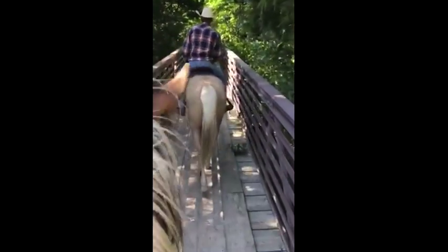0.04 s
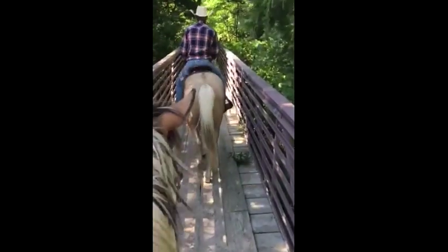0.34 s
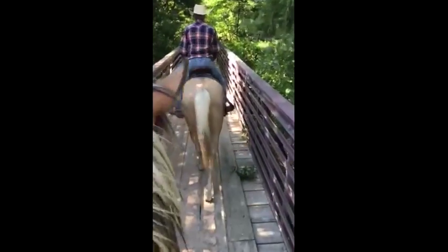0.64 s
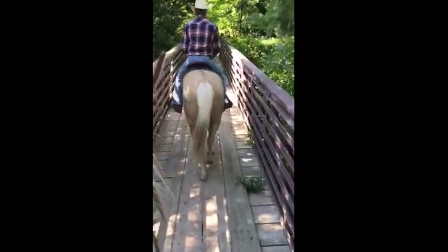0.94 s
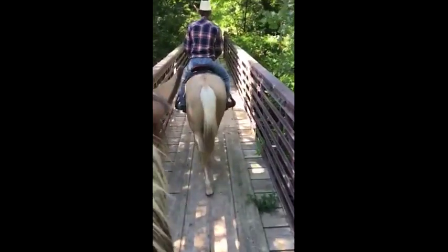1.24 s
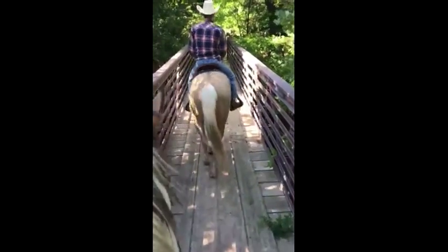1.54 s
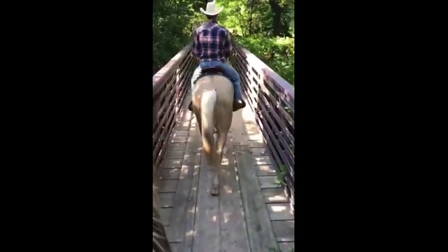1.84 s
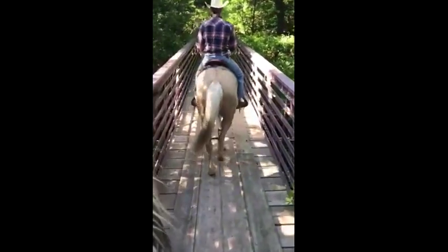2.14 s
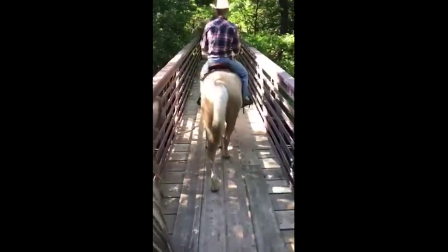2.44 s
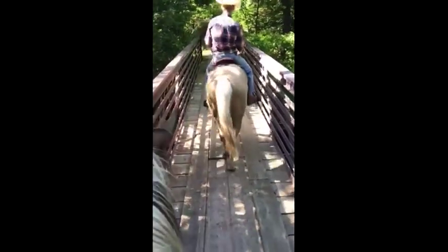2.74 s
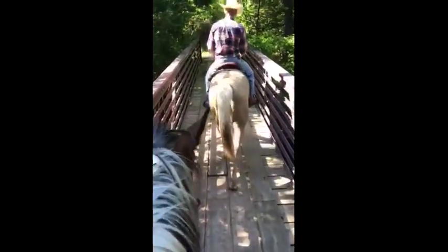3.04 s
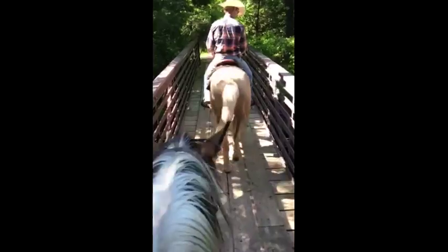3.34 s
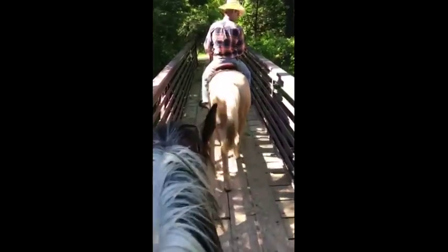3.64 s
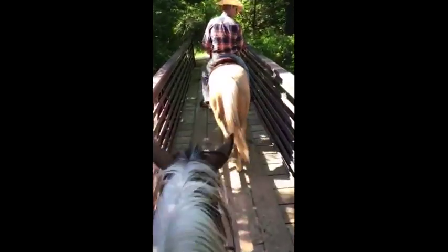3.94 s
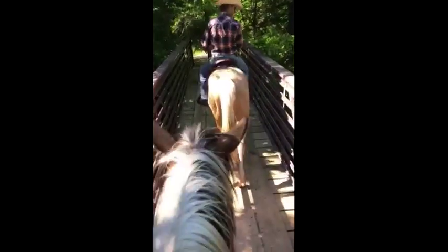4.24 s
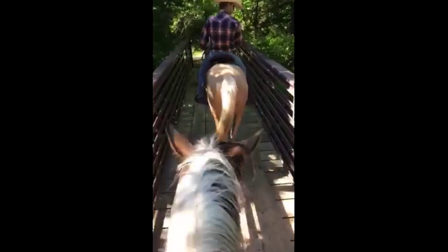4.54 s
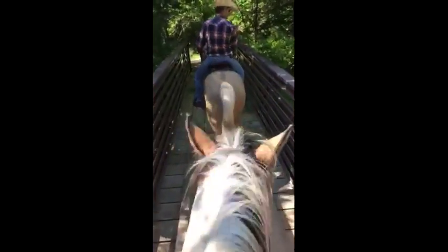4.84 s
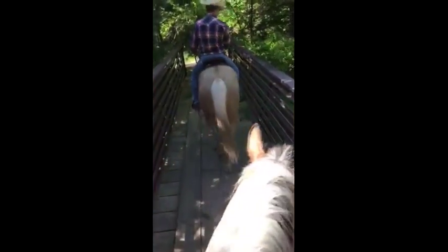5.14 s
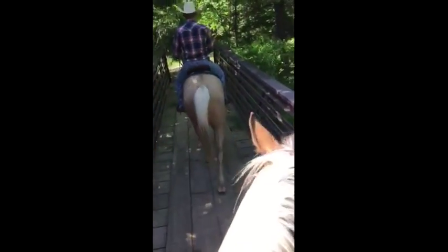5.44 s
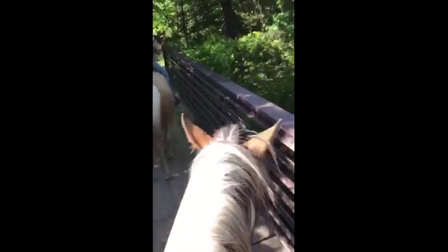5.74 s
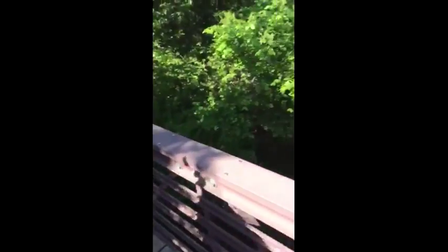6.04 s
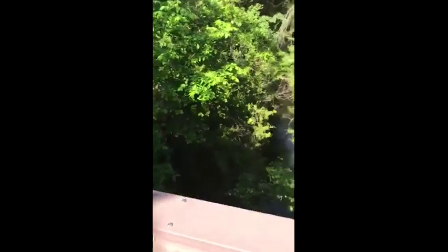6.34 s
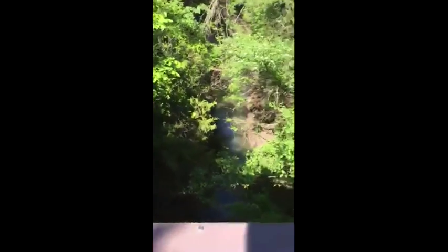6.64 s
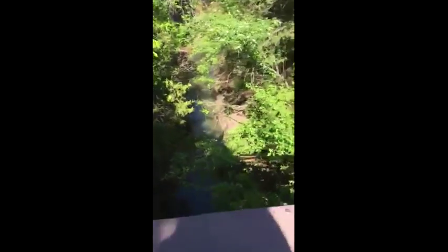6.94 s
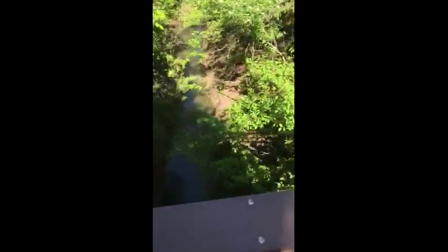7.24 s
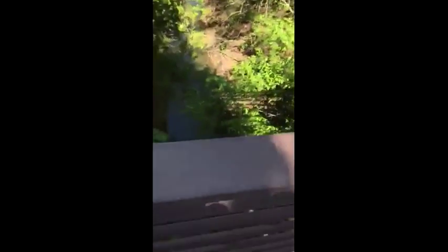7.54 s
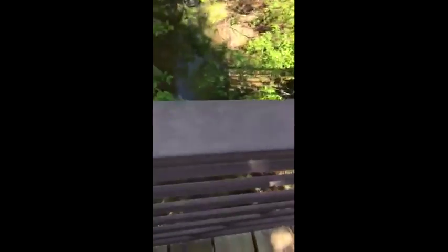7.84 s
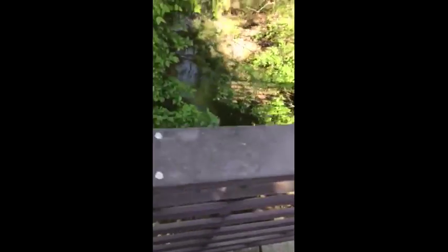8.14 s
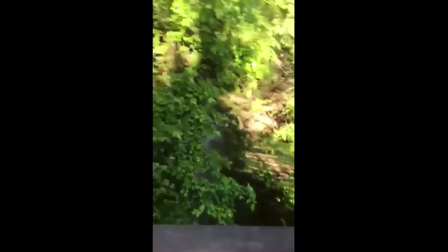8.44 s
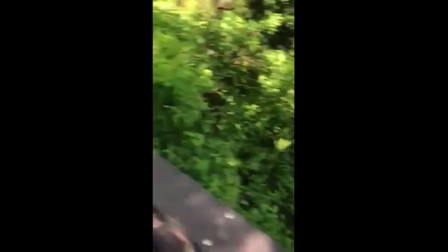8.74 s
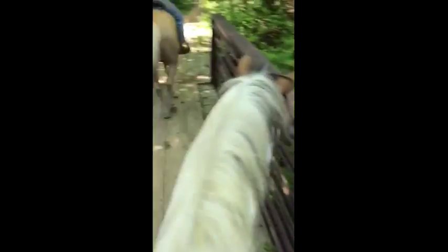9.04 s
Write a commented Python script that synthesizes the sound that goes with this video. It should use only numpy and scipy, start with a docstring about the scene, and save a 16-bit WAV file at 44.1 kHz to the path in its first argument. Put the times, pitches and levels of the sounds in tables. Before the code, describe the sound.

Hollow hoofbeats knock on wooden bridge boards from start to finish, about five or six a second, as two horses walk out of step. The first steps sound firm and tight, then the planks rattle and echo more and the span hums low underneath. Small gritty clicks and soft rubbing of tack and clothes sit close to the microphone, at saddle height, with faint steady woodland air behind.

```python
"""Two horses on a plank bridge

Woodland, heard from the saddle of the second horse. Each hoof gives a hollow clop, a board knock and a
deck thud, and keeps the span rumbling; hard landings favour the clop, soft ones the thud.
Grit crunches underfoot, the tack clicks and rustles, and the woods hiss faintly."""
import sys
import numpy as np
from scipy import signal
from scipy.fft import rfft, irfft, next_fast_len
from scipy.io import wavfile

SR = 44100
rng = np.random.default_rng(int(sys.argv[2]) if len(sys.argv) > 2 else 0)


def output_pcm(signal):
    """Save a mono or channel-first signal as 16-bit PCM at the path in sys.argv[1].

    Samples are clipped to [-1, 1] before scaling.
    """
    pcm = np.clip(np.atleast_2d(signal).T, -1, 1) * 32767
    wavfile.write(sys.argv[1], SR, np.round(pcm).astype(np.int16))


N = 405455
BLOW_S = np.arange(int(SR * .7)) / SR   # time axis of one impact
BLOW_N = len(BLOW_S)
DECK_HZ = 94.3   # stiffer spots boom above this, knock more and thud less

# Hoof falls. Each row: start in seconds, force in dB, landing hardness in dB, deck boom in Hz,
# board note in Hz, clop note in Hz.
HOOVES = [(0.003, -35.5, 3.5, 87.6, 197, 620), (0.322, -33.5, -3.5, 120, 185, 470),
          (0.598, -22, -1.5, 88.5, 215, 660), (0.969, -37.5, -7, 108, 168, 600),
          (1.27, -26.5, 4, 76, 149, 488), (1.486, -27, -3.5, 101, 220, 587),
          (1.58, -35.5, 8.5, 108, 358, 608), (1.868, -23, 2, 84.3, 179, 617),
          (2.11, -53.5, -24, 74, 180, 705), (2.228, -29, 5, 82, 291, 660),
          (2.468, -37.5, -5, 88.6, 198, 605), (2.483, -31, 4, 86.6, 425, 520),
          (2.732, -35, -2.5, 78, 203, 637), (2.797, -30, 3.5, 109, 240, 600),
          (3.068, -36.5, 0, 90, 223, 640), (3.092, -28.5, 1, 78.5, 257, 680),
          (3.332, -30, -0.5, 74.7, 185, 644), (3.675, -26.5, 0, 114, 286.5, 578),
          (3.933, -31.5, -2, 76, 199, 497), (4.005, -30, 3.5, 102, 198, 522),
          (4.262, -24.5, 0, 106.6, 207, 810), (4.488, -39, -7.5, 110.5, 184, 520),
          (4.59, -37.5, 1.5, 93, 191, 620), (4.839, -27.5, 8.5, 117, 192, 490),
          (4.86, -30.5, -5.5, 116, 192, 567), (5.078, -40.5, -4, 72, 349, 500),
          (5.189, -30.5, 9, 74, 333, 714), (5.387, -36.5, 2.5, 92.5, 296, 576),
          (5.406, -29.5, 7, 89, 281, 794), (5.629, -39, -4.5, 87, 212, 546),
          (5.777, -33, 0.5, 111, 159, 600), (5.988, -23, 4.5, 115, 171, 640),
          (6.035, -33, 3.5, 89, 157, 690), (6.211, -34.5, -0.5, 89.5, 400, 505),
          (6.326, -28.5, 5.5, 74.6, 314, 710), (6.552, -25.5, -1, 110, 200, 463),
          (6.786, -31, 0.5, 95, 188, 630), (7.109, -29.5, -7, 136, 266, 515),
          (7.143, -32.5, 4.5, 84.4, 157, 744), (7.327, -34, -0.5, 107, 172, 464),
          (7.411, -29.5, 0, 85, 361, 618), (7.631, -37, -2.5, 99, 206, 730), (7.654, -32, -3, 99, 184, 630),
          (7.88, -32.5, -1.5, 111.4, 198, 630), (7.951, -34.5, -6, 122, 180, 486),
          (8.206, -23.5, 3, 101, 314, 676), (8.346, -42.5, -1, 116, 334, 564),
          (8.43, -29.5, 3, 98, 382, 895), (8.487, -32.5, -1, 75.7, 191, 620),
          (8.521, -43.5, 6, 91, 240, 570), (8.746, -26, 1, 102, 192, 686),
          (8.993, -34, -2.5, 90.7, 242, 670)]


def clops():
    """Hoof cracks on wood and rings in three modes; boards rattle; rails and trees return the note."""
    # Board rattle spectrum. Each row: frequency in Hz, relative level in dB.
    rattle_spectrum = [(250, -28.5), (420, -7.5), (650, 3.5), (950, -3), (1250, -11), (1600, -21),
                       (2600, -32.5)]
    out, colour = np.zeros(N), response(rattle_spectrum)
    crack = irfft(response([(900, 0.5), (1400, -2), (3000, -16.5)]), BLOW_N)
    crack *= from_db(-2) / np.abs(crack).max()
    for start_s, force_db, hard_db, _, _, hz in HOOVES:
        lower_hz, upper_hz = hz * rng.normal([.72, 1.33], 0.064)
        hoof = from_db(9.5) * mode(hz, cycles=16.5, rise_s=0.0008)
        hoof += from_db(1) * mode(upper_hz, cycles=26, rise_s=0.003)
        hoof -= from_db(1) * mode(lower_hz, cycles=20, rise_s=0.002)
        loose = looseness(start_s)
        decay = from_db(-5.5) * fade(0.043) + from_db(-8.5) * loose * fade(0.25)
        boards = scatter(colour, decay * swell(0.00042))
        echo = from_db(-2.5) * loose * scatter(rfft(hoof), fade(0.2) * swell(0.062))
        add(out, start_s, from_db(force_db + hard_db - 2) * (crack + hoof + boards + echo))
    return out


def knocks():
    """The struck board bends at its own pitch and shakes its neighbours."""
    # Spectrum of the neighbouring boards. Each row: frequency in Hz, relative level in dB.
    neighbour_spectrum = [(100, -8), (170, 1), (320, -6.5), (450, -10.5), (700, -32.5)]
    board_t60_s, stiff_db_per_octave = 0.093, 7.5
    out, colour = np.zeros(N), response(neighbour_spectrum)
    for start_s, force_db, _, deck_hz, hz, _ in HOOVES:
        board = from_db(9) * mode(hz, cycles=hz * board_t60_s, rise_s=0.00039)
        decay = from_db(-1.5) * fade(0.12) + from_db(-4) * looseness(start_s) * fade(0.38)
        gain_db = force_db - 1.28 + stiff_db_per_octave * np.log2(deck_hz / DECK_HZ)
        add(out, start_s, from_db(gain_db) * (board + scatter(colour, decay)))
    return out


def looseness(start_s):
    """Gain of the lingering rattle and echo; lower on the bridge's firm first stretch."""
    firm_db, firm_s = -9, 0.99
    return from_db(firm_db * np.exp(-start_s / firm_s))


def thuds():
    """The deck booms, its pitch sagging as the horse's weight settles; the beams shake with it."""
    # Beam spectrum. Each row: frequency in Hz, relative level in dB.
    beam_spectrum = [(45, -15), (60, -2.5), (76, -4), (100, -5.5), (135, -18), (200, -24.5)]
    stiff_db_per_octave = -8
    out, colour = np.zeros(N), response(beam_spectrum)
    for start_s, force_db, hard_db, hz, *_ in HOOVES:
        deck = from_db(27) * mode(hz, cycles=6.15, rise_s=0.022, sag=0.48) * swell(1 / hz)
        beams = from_db(4) * scatter(colour, fade(0.31) * swell(0.0089))
        gain_db = force_db - hard_db + 3 + stiff_db_per_octave * np.log2(hz / DECK_HZ)
        add(out, start_s, from_db(gain_db) * (beams - deck))
    return out


def span():
    """Each step feeds the bridge's lowest bending mode, which hums on between steps."""
    # Span response to a step, greatest near mid-bridge. Each row: time in seconds, gain in dB.
    coupling = [(0, -57), (1.5, -46), (3, -38.5), (6.5, -36), (9.19, -46.5)]
    span_hz, mean_force_db, force_share = 51.7, -27, 0.52
    out, colour = np.zeros(N), response([(22, -32), (40, -20), (span_hz, 0), (66, -14)])
    for start_s, force_db, *_ in HOOVES:
        hum = mode(span_hz * rng.normal(1, 0.0423), cycles=290, rise_s=0.031)
        shake = from_db(7) * scatter(colour, fade(0.87) * swell(0.0024))
        gain_db = np.interp(start_s, *np.transpose(coupling)) + force_share * (force_db - mean_force_db)
        add(out, start_s, from_db(gain_db) * (hum + shake))
    return out


def clicks():
    """Grit crunches and tack clicks: a snap, a briefly ringing woody body and a sandy sheen."""
    # Louder clicks. Each row: start in seconds, level in dB, dullness in dB, crunch t60 in seconds.
    loud_clicks = [(0.317, -50, -1, 0.089), (0.38, -50, 5, 0.039), (0.594, -39, 2, 0.042),
                   (1.053, -47, 10, 0.063), (1.263, -32, 1.5, 0.031), (1.281, -48, 4, 0.1),
                   (1.584, -49.5, 1, 0.071), (1.673, -45, 9, 0.093), (1.868, -41.5, -0.5, 0.042),
                   (1.958, -43.5, -1, 0.05), (1.973, -42, 3, 0.08), (2.11, -53, 4, .05),
                   (2.236, -52.5, 9, 0.055), (2.287, -56, 10.5, 0.098), (2.468, -50.5, 2, 0.1),
                   (2.579, -51.5, 1.5, 0.065), (2.616, -44.5, 1.5, 0.044), (2.847, -48, 6, 0.085),
                   (2.895, -56.5, 11, 0.11), (3.096, -41.5, -3, 0.061), (3.115, -43, -1, 0.039),
                   (3.211, -47, -1, 0.03), (3.346, -47, -2.5, 0.036), (3.42, -45, 0.5, 0.04),
                   (3.681, -39.5, -0.5, 0.033), (4.005, -49, 4.5, 0.054), (4.256, -37.5, -1.5, 0.031),
                   (4.398, -54.5, 2, 0.045), (4.543, -44, 7, 0.045), (4.84, -39, 6.5, 0.065),
                   (4.955, -36, 7, 0.017), (5.244, -50.5, 4, 0.036), (5.555, -49, 0.5, 0.04),
                   (6.326, -53, 2, 0.089), (6.55, -34.5, 1, 0.016), (6.896, -48, 9.5, 0.057),
                   (7.116, -35.5, 1, 0.034), (7.327, -45.5, 0.5, 0.048), (7.596, -47, 10, 0.019),
                   (7.612, -53, 18.5, 0.017), (7.698, -35.5, 0.5, 0.031), (7.977, -52, 9.5, 0.11),
                   (8.0, -45.5, 13.5, .035), (8.006, -36, 7.5, 0.038), (8.345, -49.5, 9, 0.045),
                   (8.367, -41.5, 7, 0.011), (8.749, -37, 4.5, 0.023), (8.993, -48.5, 0, 0.073)]
    # Grit snap spectrum. Each row: frequency in Hz, relative level in dB.
    snap_spectrum = [(2400, -16), (3200, 5), (4200, 9.5), (4900, 6), (6000, 11), (9200, 4.5), (10400, -6)]
    toe_lead_s, toe_t60_s = 0.0031, 0.058   # the toe crushes grit before the hoof lands flat
    note_range_hz = (1616, 2970)
    out, snap = np.zeros(N), response(snap_spectrum)
    woody = response([(1100, -1.5), (1600, -5), (2600, -8), (3600, -6.5)])
    sheen = response([(8000, -5), (12000, -7), (16000, -12.5)])
    underfoot = [(s - toe_lead_s, force_db - 26, 0, toe_t60_s) for s, force_db, *_ in HOOVES]
    for start_s, db, dull_db, t60_s in loud_clicks + underfoot:
        # longer crunches build more slowly and leave more crumbs
        crumbs = from_db(-23) * np.sqrt(t60_s / toe_t60_s) * fade(0.41)
        envelope = (fade(t60_s) + crumbs) * swell(0.026 * t60_s)
        note = rfft(np.sin(2 * np.pi * rng.uniform(*note_range_hz) * BLOW_S) * fade(0.019))
        body = woody * (1 + 2 * note / np.abs(note).max())
        add(out, start_s, from_db(db - 0.5) * scatter(snap, envelope, spread_db=6))
        add(out, start_s, from_db(db + dull_db) * scatter(body, envelope, spread_db=5.5))
        add(out, start_s, from_db(db - 2 - dull_db) * scatter(sheen, envelope, spread_db=7))
    return out


def scrapes():
    """Gritty swishes around one bright resonance."""
    # Swishes. Each row: centre in seconds, half width in seconds, level in dB.
    swishes = [(5.25, 0.013, -56), (6.34, .04, -63), (7.9, 0.26, -64)]
    centre_hz = 6100
    t = np.arange(N) / SR
    envelope = sum(from_db(db) * np.exp(-((t - s) / width_s) ** 2) for s, width_s, db in swishes)
    band = signal.butter(1, centre_hz * np.array([.85, 1.18]), "band", fs=SR, output="sos")
    return envelope * rms_one(signal.sosfilt(band, grains(8.5, N)))


def rustle():
    """Leather tack and clothes rub."""
    # Rubbing strength. Each row: time in seconds, gain in dB.
    strength = [(0.0, -57), (0.75, -61.5), (1.1, -57.5), (2.15, -63.5), (2.4, -58), (3.0, -64.5),
                (3.55, -57.5), (4.45, -66), (4.62, -56.5), (4.8, -61.5), (5.6, -60), (5.9, -59),
                (6.75, -63), (6.95, -58.5), (7.52, -57), (7.7, -60.5), (7.97, -56), (8.15, -56),
                (8.66, -58.5), (9.19, -52.5)]
    # Leather and cloth friction spectra. Each row: frequency in Hz, relative level in dB.
    leather_spectrum = [(1400, 6), (3000, 1.5), (4200, -1), (4900, -10.5)]
    cloth_spectrum = [(4800, -4.5), (6000, -2.5), (9400, -5), (10400, -11.5), (12500, -7), (16000, -18)]
    leather = from_db(-1) * rubbing(leather_spectrum, patchy_db=3, slip_db=14)
    cloth = from_db(-10.5) * rubbing(cloth_spectrum, patchy_db=1, slip_db=15.5)
    return from_db(np.interp(np.arange(N) / SR, *np.transpose(strength))) * (leather + cloth)


def rubbing(spectrum, patchy_db, slip_db):
    """Friction noise in short patches, with tiny slips; rms 1."""
    patches_per_s, slips_per_s, slip_s = 14, 45, 0.002
    patches = np.interp(np.arange(N) / SR * patches_per_s, np.arange(200), rng.standard_normal(200))
    onsets = (rng.random(N) < slips_per_s / SR) * rng.random(N) ** 2
    slips = signal.lfilter([1], [1, -np.exp(-1 / (slip_s * SR))], onsets + 1e-18)
    envelope = from_db(patchy_db * patches) * (1 + from_db(slip_db) * slips)
    return coloured(grains(0.76, N) * envelope, spectrum)


def woods():
    """Faint, steady, dark hiss."""
    # Woodland air spectrum. Each row: frequency in Hz, relative level in dB.
    air_spectrum = [(90, 5.5), (170, -10), (450, -15), (650, -13.5), (1500, -26.5), (4000, -52),
                    (4800, -51)]
    return from_db(-45.5) * coloured(rng.standard_normal(N), air_spectrum)


def mode(hz, cycles, rise_s, sag=0, sag_s=0.014):
    """Resonance decaying 60 dB in `cycles`; starts sharp by the fraction `sag`."""
    phase = 2 * np.pi * hz * (BLOW_S + sag * sag_s * swell(sag_s))
    return np.sin(phase) * fade(cycles / hz) * swell(rise_s)


def scatter(colour, envelope, spread_db=0):
    """Crowded modes dying together, with the envelope's energy."""
    sound = irfft(rfft(grains(spread_db, BLOW_N) * envelope) * colour, BLOW_N)
    return rms_one(sound) * np.sqrt(np.mean(envelope ** 2))


def grains(spread_db, size):
    """Noise of uneven sample sizes; more spread, more crackle."""
    return rng.standard_normal(size) * from_db(spread_db * np.minimum(rng.exponential(1, size), 5))


def swell(rise_s):
    """Soft onset of one impact."""
    return 1 - np.exp(-BLOW_S / rise_s)


def fade(t60_s):
    """Exponential decay, tapered to silence at the end of the impact."""
    taper = np.cos(np.pi / 2 * (BLOW_S / BLOW_S[-1]) ** 2)
    return from_db(-60 * BLOW_S / t60_s) * taper


def response(spectrum, size=BLOW_N):
    """Minimum-phase response through (Hz, dB) points; falls 24 dB per octave outside, by up to 60 dB."""
    hz, db = np.transpose(spectrum)
    octave = np.log2(np.maximum(np.fft.rfftfreq(size, 1 / SR), 1))
    outside = np.abs(octave - np.clip(octave, np.log2(hz[0]), np.log2(hz[-1])))
    level_db = np.interp(octave, np.log2(hz), db) - np.minimum(24 * outside, 60)
    cepstrum = irfft(np.log(from_db(level_db)), size)
    cepstrum[1:size // 2] *= 2
    cepstrum[size // 2 + 1:] = 0
    return np.exp(rfft(cepstrum))


def coloured(x, spectrum):
    """Filter a full-length signal; rms 1."""
    size = next_fast_len(N)
    return rms_one(irfft(rfft(x, size) * response(spectrum, size), size)[:N])


def from_db(db):
    """Decibels to gain."""
    return 10 ** (np.asarray(db) / 20)


def rms_one(x):
    """Scale to rms 1."""
    return x / np.sqrt(np.mean(x ** 2) + 1e-20)


def add(track, start_s, sound):
    """Mix a sound into the track."""
    at = max(0, int(round(start_s * SR)))
    track[at:at + len(sound)] += sound[:N - at]


def scene():
    """Hooves, span, grit, woods and tack in mono."""
    return (clops() + knocks() + thuds() + span() + clicks() + scrapes() + woods() + rustle())[None]


def record(dry):
    """The microphone loses the deepest bass; the top is cut steeply."""
    low_cut_hz, high_cut_hz = 35, 16100
    lean = signal.sosfilt(signal.butter(4, low_cut_hz, "high", fs=SR, output="sos"), dry)
    return signal.sosfilt(signal.ellip(10, .2, 70, high_cut_hz, fs=SR, output="sos"), lean)


dry = scene()
out = record(dry)
output_pcm(out)
```